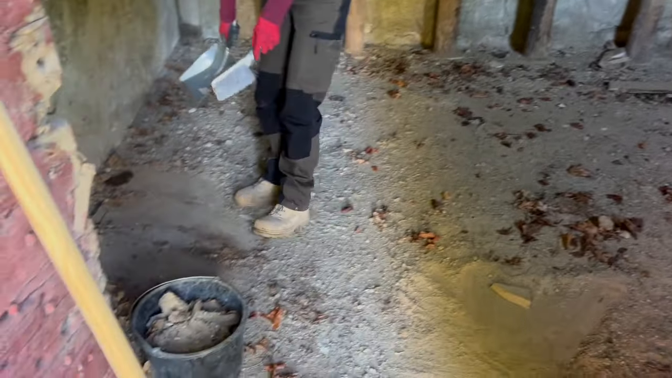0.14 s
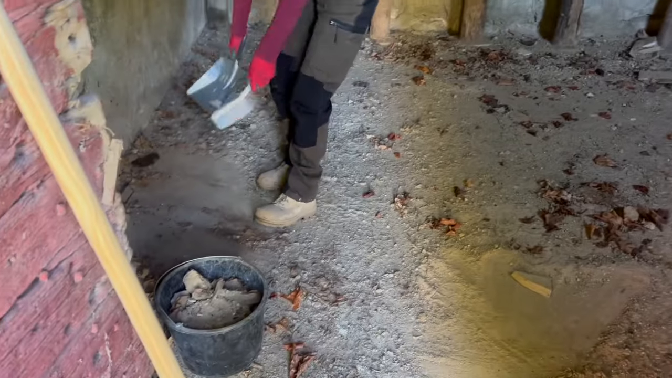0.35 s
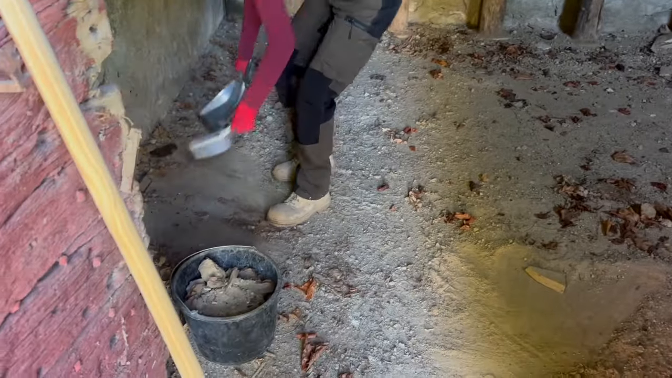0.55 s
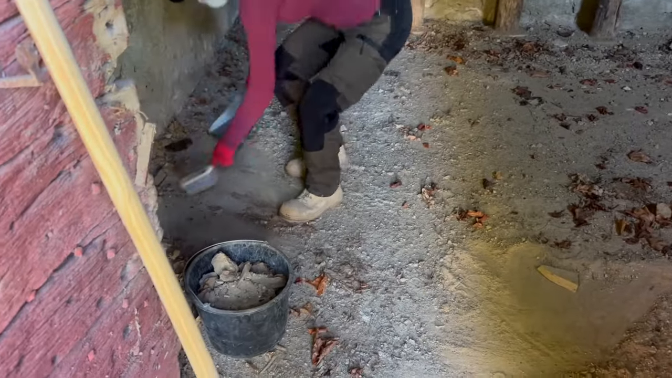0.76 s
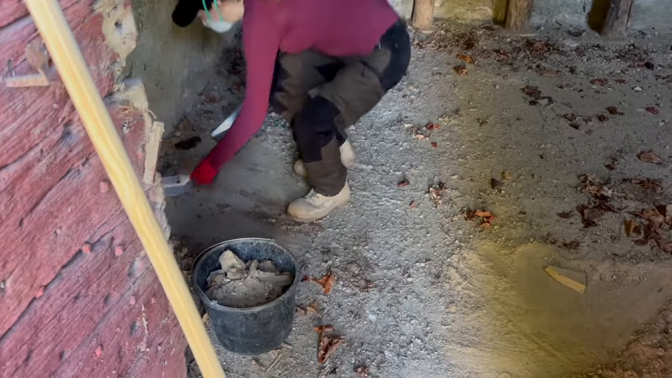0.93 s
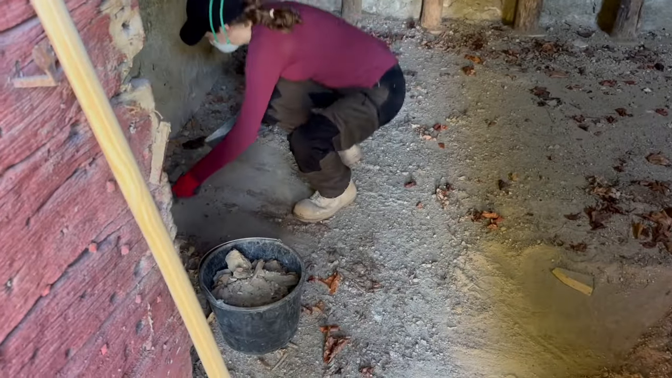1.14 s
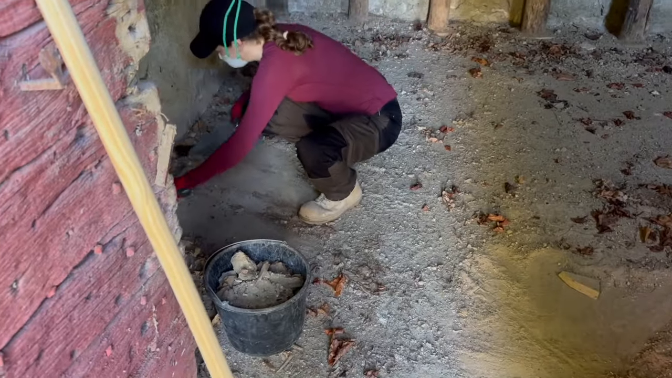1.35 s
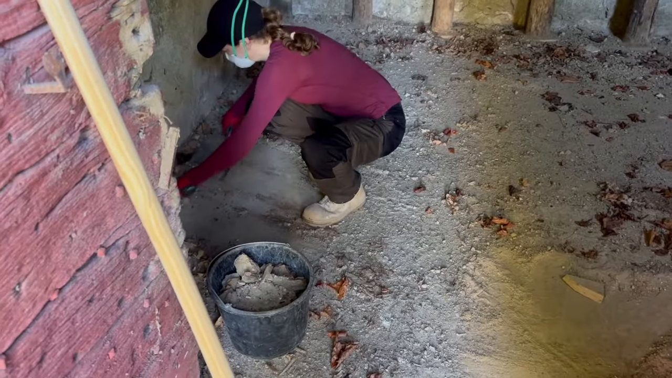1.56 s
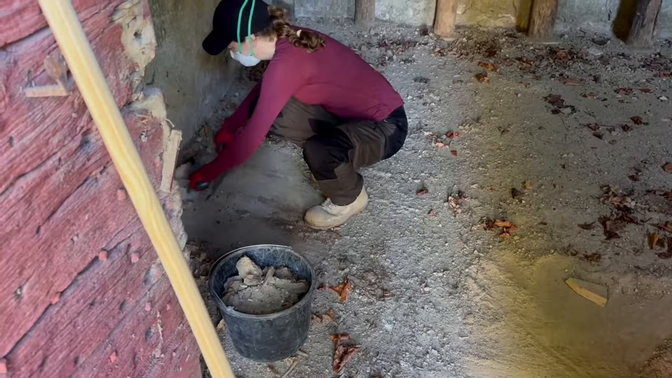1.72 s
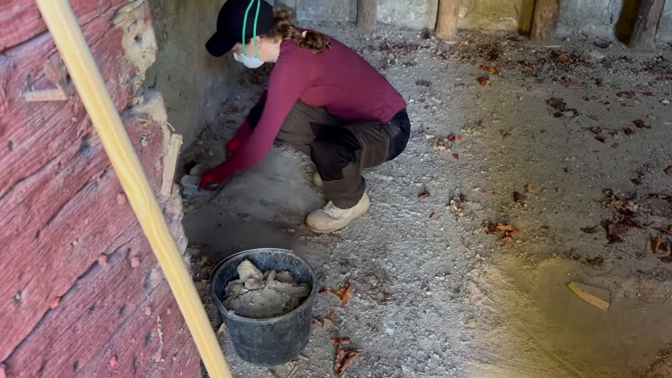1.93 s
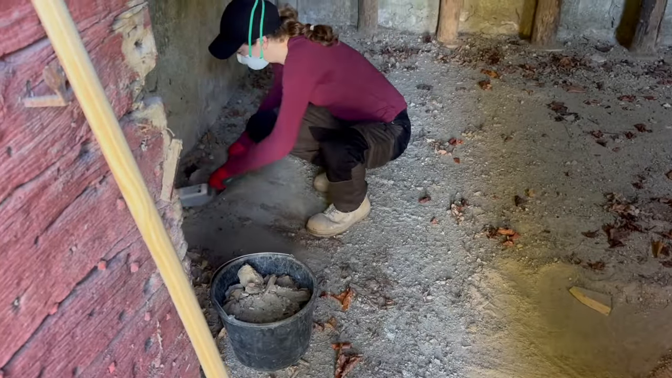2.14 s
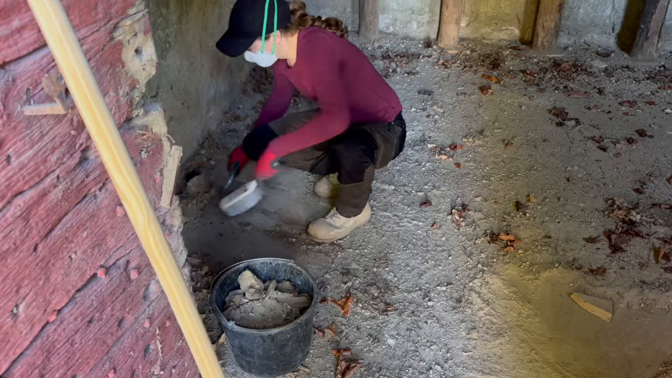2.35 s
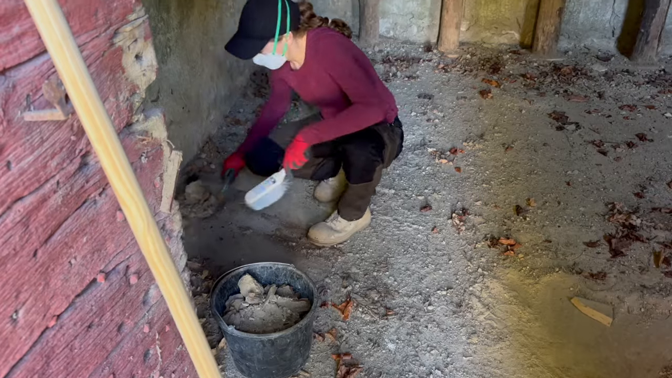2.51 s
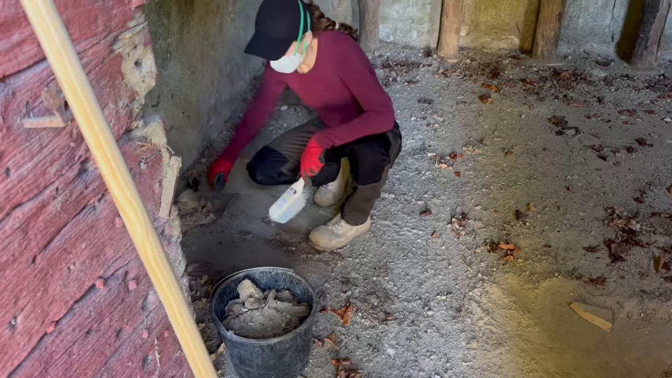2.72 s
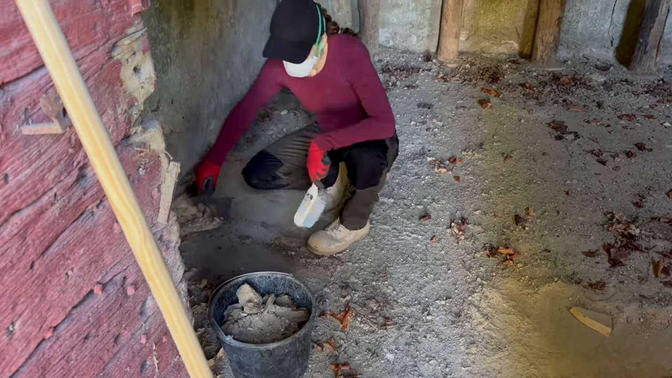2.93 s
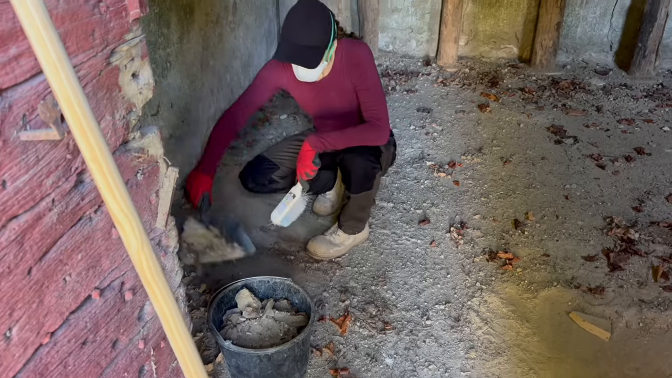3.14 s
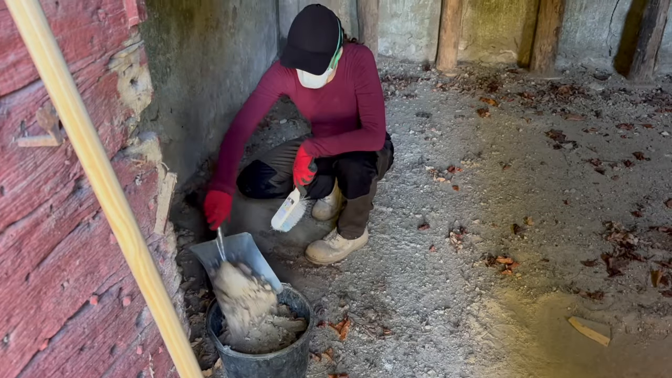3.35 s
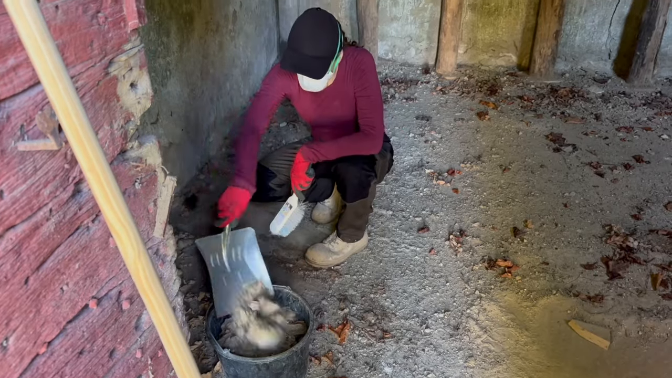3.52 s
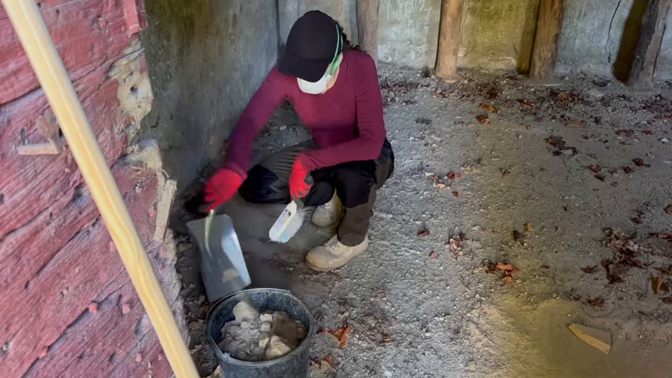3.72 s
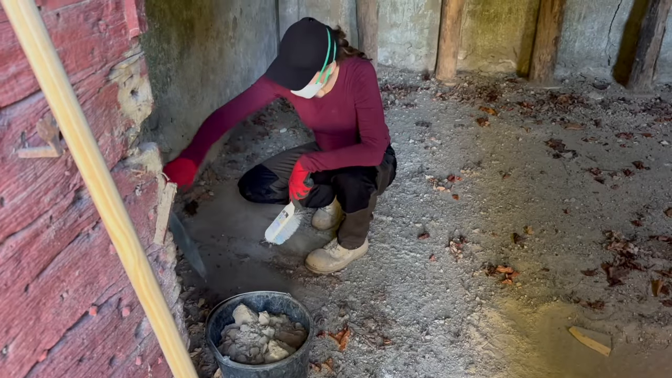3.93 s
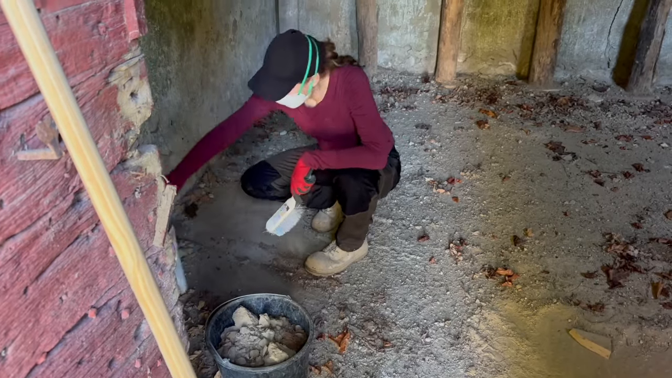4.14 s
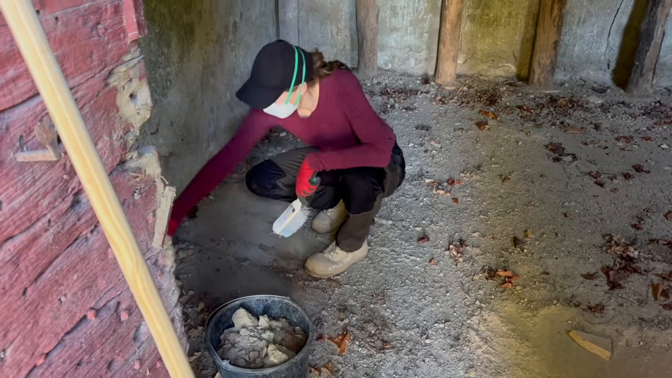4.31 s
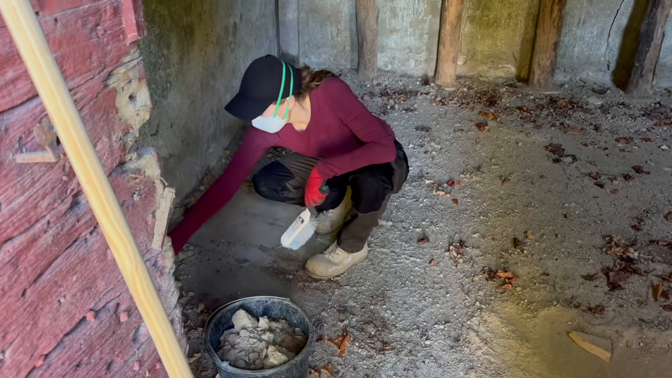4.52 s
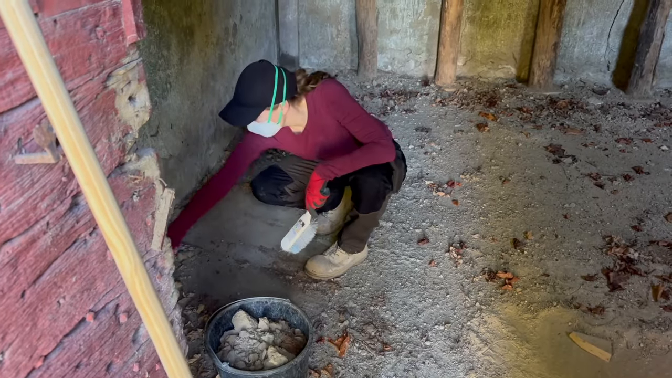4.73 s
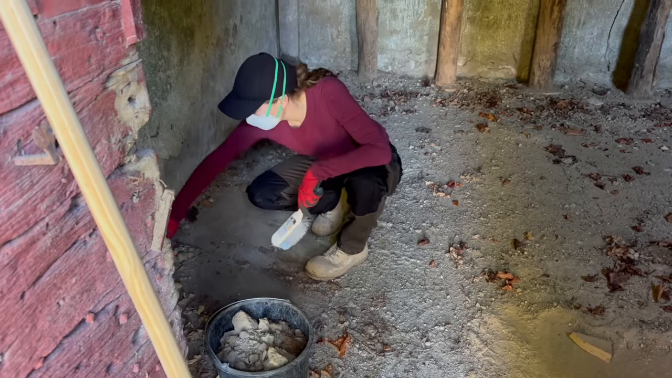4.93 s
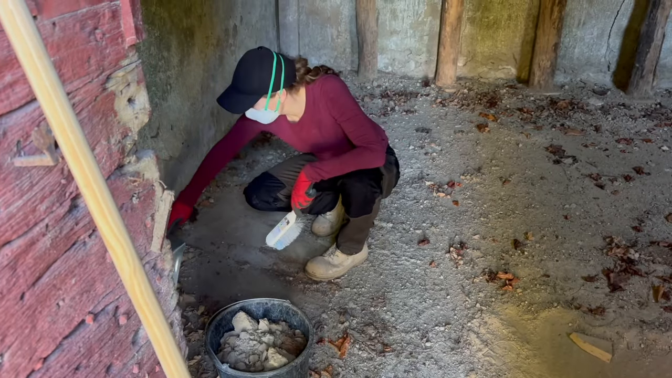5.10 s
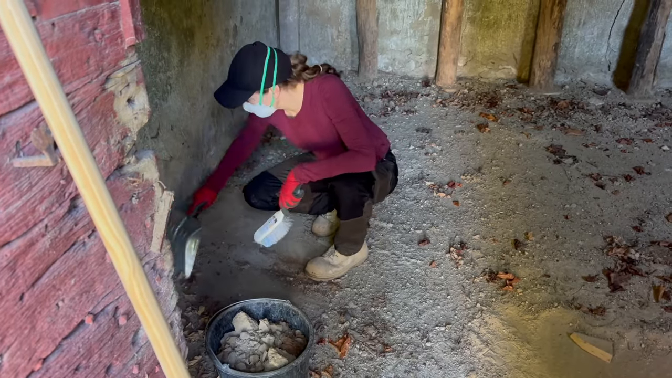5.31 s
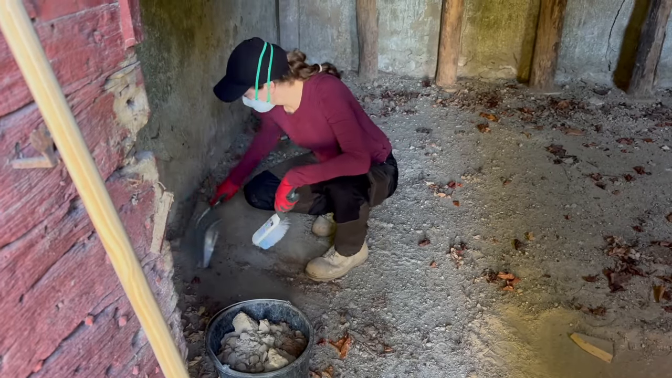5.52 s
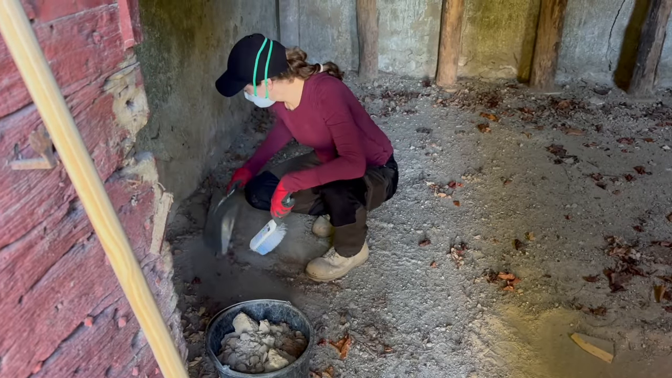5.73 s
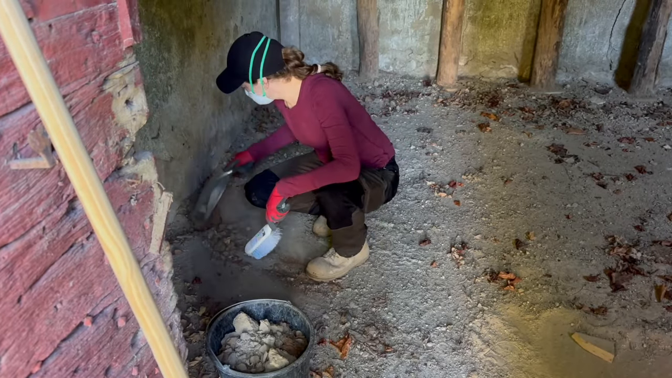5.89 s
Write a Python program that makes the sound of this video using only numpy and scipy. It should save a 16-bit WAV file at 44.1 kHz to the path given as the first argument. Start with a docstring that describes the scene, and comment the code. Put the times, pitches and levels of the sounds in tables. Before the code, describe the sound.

In a small stony cellar, soles shuffle on grit, then a metal dustpan rasps along the concrete with cracking stones. Small tugs and light knocks follow, with a faint trickle of sand. The load slides into a plastic bucket, the pan bangs the rim, dull thumps settle, and a second, heavier scrape grinds on to the end. Stereo microphone a few metres away.

```python
"""Scooping rubble in a cellar

A metal dustpan scrapes grit and rubble off a concrete floor, a few metres from the microphone. Shoes
shuffle, the pan digs in along the wall, sand runs off it, the load slides into a plastic bucket, the pan
knocks on the rim and digs in again. Scrapes are random clicks coloured by the pan, knocks and cracks are
noise bursts, thumps are low swinging tones. A short, stony room lies under it all.
"""
import sys
import numpy as np
from scipy import signal
from scipy.fft import rfft, irfft, next_fast_len
from scipy.io import wavfile
from scipy.ndimage import uniform_filter1d

SR = 44100
rng = np.random.default_rng(int(sys.argv[2]) if len(sys.argv) > 2 else 0)


def materialize(psi):
    """Save the field psi as 16-bit PCM at rate SR to the path in sys.argv[1].

    A 1-D psi becomes a single channel; in a 2-D psi each row is a channel.
    """
    bounded = np.clip(np.atleast_2d(psi).T, -1, 1)
    quanta = np.round(bounded * 32767).astype(np.int16)
    wavfile.write(sys.argv[1], SR, quanta)


N = 267290
TIME_S = np.arange(N) / SR
SIZE = next_fast_len(N + SR // 2)
FREQ_HZ = np.maximum(np.arange(SIZE // 2 + 1) * SR / SIZE, 1)

# The dB values are levels or relative shares; some layers add a further level of their own.

# Still air in the cellar. Each row: frequency in Hz, level in dB.
AIR_COLOUR = [(25, 3), (65, 3), (300, 3.5), (700, -3.5), (2500, -13), (6000, -9), (15000, -42)]
AIR_DB = -61

# Soles shift on the gritty floor. Each row: start in seconds, length in seconds, pressure in dB,
# sand relative to that in dB, heel relative to that in dB.
SHUFFLES = [(0.0, 0.052, -46.5, -1.5, -6), (0.04, 0.018, -51.5, 7.5, -13), (0.085, 0.041, -49, 7.5, -6),
            (0.22, 0.03, -54.5, 5.5, -8), (0.265, 0.052, -48, -2, 10.5), (0.37, 0.11, -52.5, 0.5, 8.5),
            (0.48, 0.15, -56.5, 1, 5), (0.62, 0.3, -59, 1, -24)]
# Tone of soles on grit. Each row: frequency in Hz, level in dB.
SHUFFLE_TONE = [(45, -21), (110, -5.5), (200, -1), (520, -8.5), (1000, -7.5), (1700, -9.5), (3500, -16.5),
                (7000, -20), (9500, -19.5), (15000, -27.5)]

# Dull thumps. Each row: start in seconds, level in dB, pitch in Hz.
THUMP_EVENTS = [(0.056, -39.5, 67.6), (0.291, -41, 252), (0.308, -46, 205), (0.328, -34, 203),
                (0.358, -49, 185), (0.569, -38.5, 144), (1.938, -32.5, 77.6), (2.433, -33, 119),
                (2.461, -39, 115), (2.606, -40, 125), (2.76, -38.5, 102), (3.666, -22, 273),
                (3.676, -22.5, 106), (3.886, -39, 94), (3.934, -25.5, 79), (4.02, -16, 65),
                (4.050, -28, 85), (4.146, -26, 65), (4.211, -20.5, 62), (4.289, -32.5, 73.5),
                (4.372, -25.5, 66), (4.403, -27.5, 52), (4.488, -30.5, 85), (4.924, -23.5, 118),
                (5.946, -30.5, 58)]

# Pan and lumps knock on bucket and floor. Each row: start in seconds, level in dB, centre in Hz.
KNOCK_EVENTS = [(0.102, -27, 2560), (0.229, -35, 1210), (0.373, -27, 950), (0.420, -23.5, 1050),
                (2.167, -33, 1290), (2.236, -19, 1500), (2.261, -24, 1300), (2.424, -30.5, 1510),
                (2.481, -17, 2900), (2.493, -16.5, 1860), (2.646, -31, 1900), (3.363, -20, 1420),
                (3.453, -19, 1400), (3.619, -7, 1550), (3.663, -10, 1200), (3.667, -15, 520),
                (3.678, -13.5, 1300), (3.690, -13, 1250), (3.797, -16, 1250), (3.954, -20.5, 1350),
                (4.019, -14, 1400), (4.048, -25, 1200)]
# Stones crack under an edge or a sole. Each row: start in seconds, level in dB.
CRACK_EVENTS = [(0.103, -18.5), (0.162, -29), (0.330, -34), (0.439, -28.5), (0.937, -24), (1.173, -35),
                (1.264, -16), (1.365, -16), (1.536, -13.5), (1.813, -21), (2.235, -45), (2.328, -45),
                (2.417, -38), (2.481, -30), (2.669, -35), (3.266, -32), (4.226, -31.5), (4.515, -29),
                (4.998, -15)]

# Force on the pan through each scoop. Each row: time in seconds, force in dB.
FIRST_SCOOP_FORCE = [(0.955, -38.5), (1.101, -36.5), (1.179, -27.5), (1.253, -33.5), (1.263, -29),
                     (1.353, -35), (1.363, -31.5), (1.42, -46.5), (1.47, -38), (1.535, -29), (1.641, -25),
                     (1.655, -27.5), (1.925, -44.5), (1.999, -56.5), (2.027, -47.5), (2.063, -66),
                     (2.11, -58.5)]
SECOND_SCOOP_FORCE = [(4.53, -25), (4.588, -30), (4.612, -32.5), (4.732, -24), (4.766, -30.5),
                      (4.858, -26.5), (4.885, -21), (4.93, -24.5), (4.97, -29), (4.998, -21.5),
                      (5.064, -28.5), (5.14, -25), (5.286, -30), (5.326, -36.5), (5.434, -28.5),
                      (5.474, -33.5), (5.52, -26.5), (5.604, -26.5), (5.786, -47), (5.934, -33.5),
                      (5.955, -38)]
# Forward strokes in each scoop and what they meet. Each row: start in seconds, sand in dB, lumps in dB,
# both relative to the force.
FIRST_STROKES = [(0.933, 3.5, 0.5), (1.12, 0.5, -4), (1.485, -2.5, -8.5)]
SECOND_STROKES = [(4.51, -2.5, -2), (5.34, -7.5, -6.5), (5.82, -4.5, -12)]
# Tone of each scoop. Each row: frequency in Hz, level in dB.
FIRST_TONE = [(45, -13), (110, -1.5), (210, -0.5), (285, -7), (400, -4), (750, 1.5), (1000, 3.5),
              (1500, 3.5), (2200, -4.5), (5500, -3), (10000, -3), (15000, -18.5)]
SECOND_TONE = [(45, -23), (115, 3.5), (185, -1.5), (300, 8.5), (480, 5.5), (585, 1), (750, 4), (980, 2),
               (1500, -1), (2200, -9), (3800, -12), (5500, -13), (10000, -16), (15000, -30)]
# As the pan fills, the sand's hiss dulls; lumps start to roll a moment after the edge bites.
DULLING_DB_PER_S, LUMP_LAG_S = 5, 0.006
# The heap of lumps is sluggish: this is the share of the quick jerks of force that it misses.
HEAP_INERTIA = 0.55
# A loose stone fades to about a third of its swing in this many cycles.
STONE_CYCLES = 1.5

# Resonances of the pan. Each row: frequency in Hz, width in Hz, lift in dB when pushed lightly,
# lift in dB when pushed hard, lift in dB when tipped.
PAN_MODES = [(115, 130, -1.5, 6.3, 0.5), (240, 17, 4, 6, -7), (377, 84, 1.5, 1.8, -2),
             (425, 36, 6.5, 3.5, 1), (693, 100, 5, 7.7, 0), (819, 120, 7, 2.8, 4.5), (1220, 65, 8, 2, -6),
             (1445, 130, -4.5, 3.9, 7.5), (1585, 870, 12, 5.3, 7.5), (1654, 93, 0, 4.6, 8),
             (2450, 68, 1, 0.73, -1.5), (2830, 68, 9, 1, 3), (3030, 89, 1, 6.3, 7),
             (3500, 320, -0.5, 0.88, 5.5), (4990, 150, 6.5, 6.2, 5.5), (5360, 350, 2.5, 3.9, 8.5),
             (5860, 270, 3.5, 3.8, 6), (6540, 130, 4.5, 8.7, 6), (7300, 510, 4, 0.3, 1.5),
             (8580, 1500, 1.5, 3.3, 3.5), (13930, 2000, 14, 15.6, 11)]

# The edge bites and chatters, or sliding grit rings the blade. Each row: start in seconds,
# length in seconds, start pitch in Hz, end pitch in Hz, width in Hz, level in dB.
CHATTER_EVENTS = [(0.939, 0.034, 5620, 5540, 240, -37), (0.936, 0.11, 800, 762, 130, -34.5),
                  (0.947, 0.12, 705, 702, 90, -31.5), (0.954, 0.22, 2406, 2460, 80, -42.5),
                  (0.95, 0.17, 3400, 3420, 90, -44.5), (1.14, 0.074, 3520, 3600, 71, -39),
                  (1.151, 0.228, 765, 724, 110, -34.5), (1.262, 0.053, 1205, 1326, 160, -32.5),
                  (1.48, 0.07, 2830, 2790, 140, -42), (1.518, 0.17, 380, 381, 28, -39),
                  (1.583, 0.2, 1533, 1620, 67.4, -37), (3.4, 0.16, 1610, 1694, 60, -36),
                  (4.517, 0.063, 705, 697, 23, -28.5), (4.515, 0.13, 897, 860, 44, -30),
                  (4.526, 0.087, 1407, 1393, 36, -30.5), (4.524, 0.11, 425, 436, 45, -35.5),
                  (4.513, 0.041, 1845, 1843, 30, -28.5), (4.67, 0.13, 834, 816, 40, -33),
                  (4.867, 0.088, 1410, 1338, 70, -30), (4.868, 0.19, 680, 655, 55, -32),
                  (4.987, 0.037, 5000, 5100, 700, -23.5), (5.063, 0.19, 814, 789, 35, -34.5),
                  (5.199, 0.13, 480, 453, 45, -29), (5.406, 0.15, 440, 489.6, 90, -29.5),
                  (5.549, 0.13, 496.6, 446.5, 90, -26.5), (5.561, 0.091, 1610, 1630, 45, -40),
                  (5.898, 0.072, 1105, 1150, 70, -27.5), (5.901, 0.068, 1700, 1763, 120, -35),
                  (5.902, 0.043, 3340, 3390, 80, -41.5)]

# The pan is drawn back in short tugs. Each row: start in seconds, length in seconds, force in dB,
# sand relative to that in dB, lumps relative to that in dB.
TUGS = [(2.125, 0.18, -54, -4, -1), (2.222, 0.095, -45.5, -8, -1), (2.395, 0.09, -44, -6.5, 0)]
# Tone of the tugs. Each row: frequency in Hz, level in dB.
DRAG_TONE = [(45, -30), (120, 2.5), (200, -9), (520, -9), (1000, -2), (1700, -3.5), (3500, -10.5),
             (6000, -16.5), (9000, -19.5), (14000, -33)]

# Sand runs off the lifted pan in spills. Each row: start in seconds, length in seconds, flow in dB,
# sand relative to that in dB, lumps relative to that in dB.
SPILLS = [(2.5, 0.043, -45, 8, -4.5), (2.645, 0.14, -49, 10.5, -7), (2.83, 0.11, -56, 10.5, -2.5)]
# Tone of the spills. Each row: frequency in Hz, level in dB.
TRICKLE_TONE = [(45, -6), (120, -6), (280, -1.5), (520, -11), (1300, -11), (3500, -18), (6000, -12.5),
                (9000, -13), (15000, -20.5)]

# The load slides into the bucket. Each row: time in seconds, flow in dB.
POUR_FLOW = [(3.28, -51), (3.314, -44.5), (3.37, -35), (3.408, -31.5), (3.456, -31.5), (3.506, -35),
             (3.56, -36), (3.6, -39.5)]
# The pan is tipped. Each row: start in seconds, sand in dB, lumps in dB, both relative to the flow.
POUR_STROKES = [(3.253, 4.004, -0.5)]
# Crumbs settle in the bucket and rattle on the pan. Each row: start in seconds, length in seconds,
# level in dB, sand relative to that in dB, lumps relative to that in dB.
SETTLING = [(3.6, 0.053, -38, 1.5, 1.5), (3.92, 0.096, -50, 2.5, -3), (4.015, 0.011, -48.5, -22, -21.5),
            (4.16, 0.084, -54, -0.5, -2), (4.39, 0.019, -54, -27.5, -17.5)]
# Tone of the sliding and settling load. Each row: frequency in Hz, level in dB.
POUR_TONE = [(45, -8.5), (130, 2.5), (280, 4.5), (600, -2), (850, 2.5), (1600, -4), (2300, -6.5),
             (5500, -9), (10000, -9), (15000, -19.5)]

# How long echoes take to fall by 60 dB. Each row: frequency in Hz, time in seconds.
ECHO_TIMES = [(120, 0.48), (600, 0.3), (2500, 0.17), (7000, 0.1), (14000, 0.0073)]
# Level and phase differences between left and right. Each row: frequency in Hz, left minus right in dB,
# lead of left over right in radians.
STEREO_DIFFERENCES = [(60, 0, 0), (200, -.5, 0), (380, 2.5, 0), (800, 0, 0), (1550, -1, 1.3),
                      (2100, -1, .4), (3200, 1, 1), (4400, 5, .9), (6500, 2, .8), (7700, 1, 1.6),
                      (8600, 0, 0), (9600, 0, -1.4), (10700, 0, -2.9), (12000, 0, -3.4), (13500, 0, -6.2)]
LOW_CUT_HZ, TOP_HZ, END_S = 37.6, 16300, 5.972


def undb(db):
    """Decibels to gain."""
    return 10 ** (np.asarray(db) / 20)


def unit(x):
    """Scale to an average strength (rms) of 1."""
    return x / np.sqrt(np.mean(x ** 2) + 1e-20)


def shaped(x, gain):
    """Filter by a gain per frequency."""
    return irfft(rfft(x, SIZE) * gain, SIZE)[..., :N]


def colour(points):
    """Gain per frequency, joined up between the points of a tone table."""
    hz, db = np.transpose(points)
    return undb(np.interp(np.log(FREQ_HZ), np.log(hz), db))


def add(track, s, sound):
    """Mix a short sound in at a time in seconds."""
    start = max(int(s * SR), 0)
    track[start:start + len(sound)] += sound[:N - start]


def walk(rate):
    """Smooth random wander with a spread near 1, taking this many steps a second."""
    knots = rng.standard_normal(8192)
    return 1.36 * np.interp(TIME_S * rate, np.arange(len(knots)), knots)


def air():
    """Still air: steady coloured noise, different on each side."""
    noise = rng.standard_normal((2, N))
    return unit(shaped(noise, colour(AIR_COLOUR))) * undb(AIR_DB)


def grains(rate, spread_db):
    """Random clicks, many small and a few large, at this average rate per second."""
    sizes = undb(spread_db * np.minimum(rng.exponential(size=N), 5))
    present = rng.random(N) < rate / SR
    return unit(present * rng.choice([-1, 1], N) * sizes)


def rub(motion, tone, rate, spread_db, jerk_db, low_db, mid_db, high_db):
    """Grit in jerky motion: lumps rumble, crumbs crunch, fine sand hisses, all catching and slipping together."""
    # the smaller the grain, the higher it sounds
    below = 1 / (1 + (FREQ_HZ / 570) ** 8)
    above = 1 / (1 + (2600 / FREQ_HZ) ** 8)
    between = (1 - below) * (1 - above)
    lumps = unit(shaped(grains(rate / 4, spread_db / 2), tone * np.sqrt(below))) * undb(low_db)
    crumbs = unit(shaped(grains(rate / 2, spread_db), tone * np.sqrt(between))) * undb(mid_db)
    fines = unit(shaped(grains(rate * 2, spread_db), tone * np.sqrt(above))) * undb(high_db)
    mix = np.sum(motion * np.array([lumps, crumbs, fines]), axis=0)
    return mix * undb(jerk_db * walk(90))


def scuffs(rows, attack_s, release_db_per_s):
    """Gains of lumps, crumbs and sand in short moves: each swells, holds, then dies as the grains come to rest."""
    power = np.zeros((3, N))
    for s, length, db, sand_db, weight_db in rows:
        swell = np.clip((TIME_S - s) / attack_s, 0, 1)
        fade_db = release_db_per_s * np.maximum(TIME_S - s - length, 0)
        envelope = swell * undb(db - fade_db)
        power += np.outer(undb([weight_db, 0, sand_db]), envelope) ** 2
    return np.sqrt(power)


def shuffle():
    """Soles grind on the floor: grit is rubbed in short moves."""
    steps = scuffs(SHUFFLES, attack_s=0.033, release_db_per_s=134)
    return rub(steps, colour(SHUFFLE_TONE), rate=4000, spread_db=2.5, jerk_db=-1.0,
               low_db=-10.5, mid_db=0.5, high_db=-0.5)


def echoes(apart_hz=600, together_hz=10500):
    """Dense reflections off stone, dying sooner in the treble; bass and top are alike on both sides."""
    hz, t60 = np.transpose(ECHO_TIMES)
    t = TIME_S[:SR // 2]
    f = np.maximum(np.arange(len(t) // 2 + 1) * SR / len(t), 1)
    mid, side = rfft(rng.standard_normal((2, len(t))))
    apart = f / np.hypot(f, apart_hz) / (1 + (f / together_hz) ** 4)
    noise = (mid + np.array([[1], [-1]]) * apart * side) / np.hypot(1, apart)
    tail = np.zeros((2, len(t)))
    # each band of pitch fades at its own speed
    for share, decay in zip(np.eye(len(hz)), t60):
        band = irfft(noise * np.interp(np.log(f), np.log(hz), share), len(t))
        tail += band * np.exp(-np.log(1000) * t / decay)
    tail *= t > .002  # the first echo arrives late
    return tail / np.sqrt(np.sum(tail ** 2) / 2)


def cellar(x, wet_db, count=1):
    """Direct sound plus echoes; as the work moves from spot to spot in turn, the echoes favour other pitches."""
    spot = np.arange(N) // 3072 % count
    shares = uniform_filter1d(1. * (spot == np.arange(count)[:, None]), size=1536)
    shares /= np.sqrt(np.sum(shares ** 2, axis=0))
    wet = sum(signal.oaconvolve((x * share)[None], echoes(), axes=1)[:, :N] for share in shares)
    return (x + undb(wet_db) * wet) / np.sqrt(1 + undb(2 * wet_db))


def thumps(rise_s=0.0048, side_db=-7):
    """Soft, heavy contacts: low tones swell and fade, each a little out of step between left and right."""
    mid, side, t = np.zeros(N), np.zeros(N), TIME_S[:SR // 5]
    leans = rng.choice([-1, 1], len(THUMP_EVENTS))
    for (s, db, hz), lean in zip(THUMP_EVENTS, leans):
        swell = undb(db) * t / rise_s * np.exp(1 - t / rise_s)
        add(mid, s, swell * np.sin(2 * np.pi * hz * t))
        add(side, s, swell * np.cos(2 * np.pi * hz * t) * lean * undb(side_db))
    return cellar(mid, wet_db=-13) + np.array([side, -side])


def blow(hz, width_hz, decay_s, snap, order):
    """A sharp contact and its crumbling tail in one broad resonance, peak 1."""
    t = TIME_S[:SR // 16]
    edges = np.hypot(hz, width_hz / 2) + np.array([-width_hz, width_hz]) / 2
    b, a = signal.butter(order, np.minimum(edges, SR / 2 - 1000), "band", fs=SR)
    crumbling = rng.standard_normal(len(t)) * np.exp(-t / decay_s)
    burst = signal.lfilter(b, a, snap * (t == 0) + crumbling)
    return burst / np.abs(burst).max()


def knocks(gain_db=-5.5):
    """Damped knocks of the hand-held pan and lumps: a snap and a short noise tail around one pitch."""
    out = np.zeros(N)
    for s, db, hz in KNOCK_EVENTS:
        knock = blow(hz, width_hz=0.8 * hz, decay_s=0.005, snap=12, order=4)
        add(out, s, undb(db + gain_db) * knock)
    return out


def cracks():
    """Sharp cracks of stone: very short bursts of bright noise."""
    out = np.zeros(N)
    for s, db in CRACK_EVENTS:
        add(out, s, undb(db) * blow(hz=5930, width_hz=10000, decay_s=.003, snap=0, order=2))
    return out


def resonance(hz, width_hz):
    """Response of one damped resonance, gain 1 at its centre."""
    return 1 / (1 + 1j * (FREQ_HZ ** 2 - hz ** 2) / (FREQ_HZ * width_hz))


def pan_body(axis):
    """The pan lifts whatever touches it at its resonances; how much depends on where it is touched."""
    return 1 + sum((undb(lifts[axis]) - 1) * resonance(hz, width) for hz, width, *lifts in PAN_MODES)


def push(curve, strokes, bite_s, dulling_db_per_s, lag_s):
    """Gains of lumps, crumbs and sand under a moving pan: in each stroke sand leads and thins, lumps follow late."""
    force_db = np.interp(TIME_S, *np.transpose(curve))
    starts, sand_db, weight_db = np.transpose(strokes)
    stroke = np.maximum(np.searchsorted(starts, TIME_S) - 1, 0)
    age = np.maximum(TIME_S - starts[stroke], 0)
    bite = np.clip((TIME_S - starts[0]) / bite_s, 0, 1)
    contact = bite * np.interp(TIME_S - curve[-1][0], [0, .04], [1, 0])
    rolling = age ** 4 / (age ** 4 + lag_s ** 4)
    jerks_db = force_db - uniform_filter1d(force_db, size=8192)
    lumps = rolling * undb(weight_db[stroke] - HEAP_INERTIA * jerks_db)
    sand = undb(sand_db[stroke] - dulling_db_per_s * age)
    loads = uniform_filter1d(np.array([lumps, np.ones(N), sand]), size=1024)
    return contact * undb(force_db) * loads


def stones(motion, size_db, low_hz, high_hz, count):
    """Single stones tick at random moments, as hard as the grit around them is moving."""
    out, t = np.zeros(N), TIME_S[:SR // 8]
    for when, pitch, size in rng.random((count, 3)):
        force = motion[int(when * N)]
        hz = low_hz * (high_hz / low_hz) ** pitch
        if force > 1e-3:
            tick = np.sin(2 * np.pi * hz * t) * np.exp(-t * hz / STONE_CYCLES)
            add(out, when * N / SR, force * undb(size_db - 10 * size) * tick)
    return out


def scoops():
    """The pan is pushed through the grit, which rings its sheet metal."""
    light = push(FIRST_SCOOP_FORCE, FIRST_STROKES, bite_s=0.004,
                 dulling_db_per_s=DULLING_DB_PER_S, lag_s=LUMP_LAG_S)
    heavy = push(SECOND_SCOOP_FORCE, SECOND_STROKES, bite_s=0.0058,
                 dulling_db_per_s=DULLING_DB_PER_S, lag_s=LUMP_LAG_S)
    first = rub(light, colour(FIRST_TONE) * pan_body(axis=0), rate=2600, spread_db=1.0, jerk_db=0.6,
                low_db=-2.0, mid_db=-1.5, high_db=1.5)
    second = rub(heavy, colour(SECOND_TONE) * pan_body(axis=1), rate=1700, spread_db=1.4, jerk_db=1.52,
                 low_db=-2.5, mid_db=-2.5, high_db=4.5)
    pebbles = stones(light[1] + heavy[1], size_db=11, low_hz=915, high_hz=6400, count=260)
    chunks = stones(heavy[0], size_db=7.0, low_hz=130, high_hz=480, count=160)
    return first + second + pebbles + chunks


def roam(x, swing_db, rate):
    """The contact wanders along the edge, so each narrow resonance of the pan comes and goes on its own."""
    spectrum = rfft(x, SIZE)
    out = x.copy()
    for hz, width, *_ in PAN_MODES:
        if hz > 500 and width < hz / 8:
            ring = irfft(spectrum * resonance(hz, width), SIZE)[:N]
            out += (undb(swing_db * (walk(rate) - .2)) - 1) * ring
    return out


def chatter():
    """Stick and slip of the edge keep a blade resonance going; it glides as the blade flexes."""
    out, t = np.zeros(N), TIME_S[:SR // 2]
    for s, length, start_hz, end_hz, width, db in CHATTER_EVENTS:
        swing = rng.standard_normal(len(t)) + 1j * rng.standard_normal(len(t))
        # two smoothings slow the random swing to the width of the resonance
        for pole in np.exp(-np.pi * width / SR * np.array([1, 2])):
            swing = signal.lfilter([1 - pole], [1, -pole], swing)
        steady = swing / np.abs(swing) ** .7  # friction evens out the swing
        glide_hz = np.interp(t, [0, length], [start_hz, end_hz])
        phase = 2 * np.pi * np.cumsum(glide_hz) / SR
        ring = np.real(steady * np.exp(1j * phase))
        contact = np.interp(t, [0, .006, length * .7, length * 1.2], [0, 1, .8, 0])
        add(out, s, undb(db) * contact * unit(ring))
    return out


def drag():
    """The pan is drawn back over the grit in short tugs."""
    tugs = scuffs(TUGS, attack_s=0.035, release_db_per_s=120)
    return rub(tugs, colour(DRAG_TONE), rate=2400, spread_db=2.0, jerk_db=-2.0,
               low_db=-4.0, mid_db=1.5, high_db=2)


def trickle():
    """Sand runs off the lifted pan in short spills of clicks."""
    spills = scuffs(SPILLS, attack_s=0.045, release_db_per_s=113)
    return rub(spills, colour(TRICKLE_TONE), rate=1100, spread_db=1.0, jerk_db=-2.0,
               low_db=-3.0, mid_db=-4, high_db=-3.5)


def pour():
    """The load slides off the tipped pan and settles in the bucket, with single stones ticking."""
    tone = colour(POUR_TONE) * pan_body(axis=2)
    flow = push(POUR_FLOW, POUR_STROKES, bite_s=0.014, dulling_db_per_s=26.5, lag_s=0.077)
    slide = rub(flow, tone, rate=1700, spread_db=2.0, jerk_db=0.5, low_db=-3.5, mid_db=2.0, high_db=4.0)
    rest = scuffs(SETTLING, attack_s=0.0042, release_db_per_s=62.0)
    settling = rub(rest, tone, rate=3100, spread_db=3.5, jerk_db=1.0, low_db=-2.5, mid_db=0.0, high_db=-3.5)
    ticks = stones(flow[1] + rest[1], size_db=16.0, low_hz=1250, high_hz=6520, count=560)
    return slide + settling + ticks


def scene():
    """All the work in the cellar over still air."""
    pan = roam(scoops() + pour(), swing_db=2.2, rate=18)
    grit = cellar(pan + shuffle() + drag() + trickle(), wet_db=-3.5, count=6)
    rings = cellar(chatter(), wet_db=-12)
    hits = cellar(knocks() + cracks(), wet_db=-10.5)
    return air() + grit + thumps() + hits + rings


def record(dry):
    """Left and right differ in level and phase; the deep bass and the top are cut, the sound stops short."""
    hz, lean_db, lead = np.transpose(STEREO_DIFFERENCES)
    left = undb(np.interp(FREQ_HZ, hz, lean_db) / 2)
    right = np.exp(-1j * np.interp(FREQ_HZ, hz, lead)) / left
    sound = shaped(dry, np.array([left, right]))
    sound = signal.sosfilt(signal.butter(2, LOW_CUT_HZ, "high", fs=SR, output="sos"), sound)
    sound = sound * np.clip((END_S - TIME_S) * SR / 64, 0, 1)  # fades out over 64 samples
    return signal.sosfilt(signal.ellip(10, .2, 80, TOP_HZ, fs=SR, output="sos"), sound)


dry = scene()
out = record(dry)
materialize(out)
```